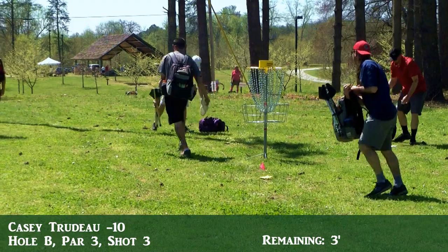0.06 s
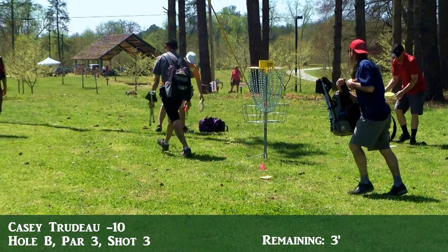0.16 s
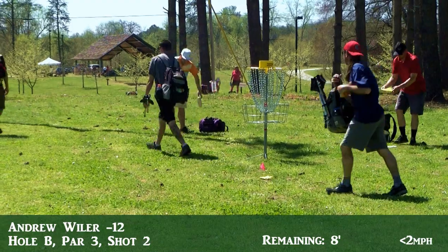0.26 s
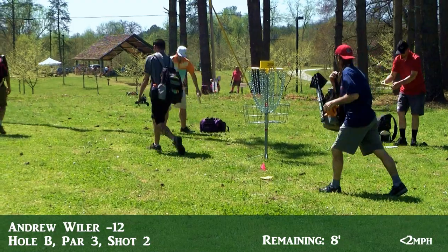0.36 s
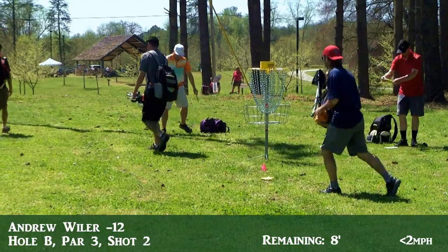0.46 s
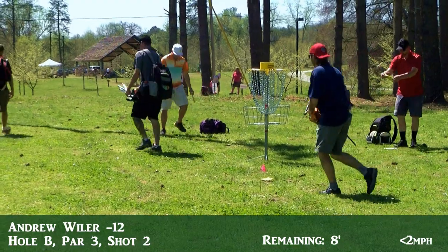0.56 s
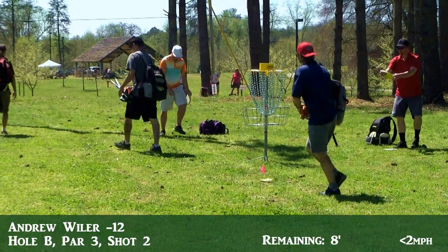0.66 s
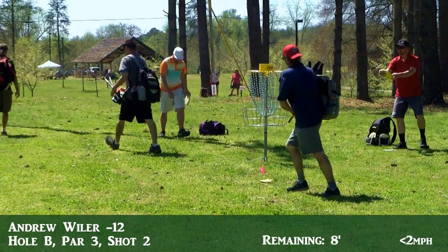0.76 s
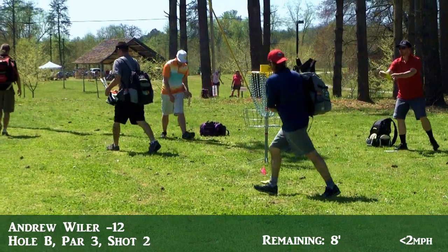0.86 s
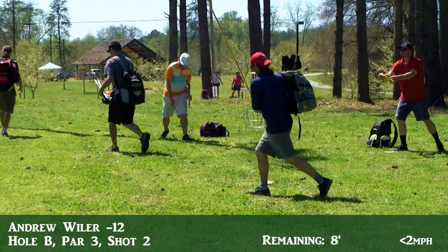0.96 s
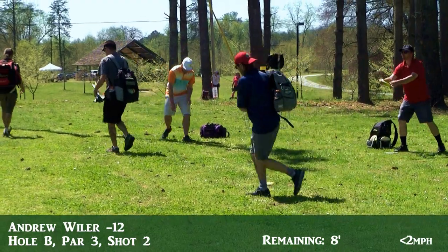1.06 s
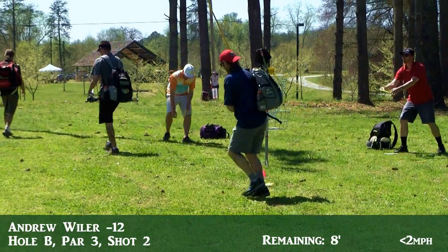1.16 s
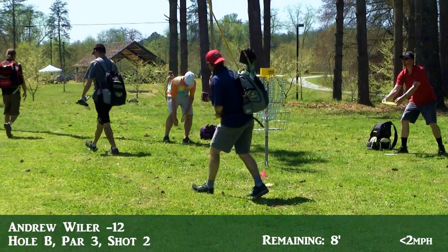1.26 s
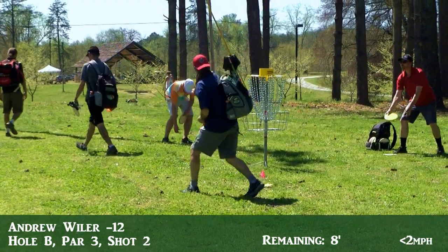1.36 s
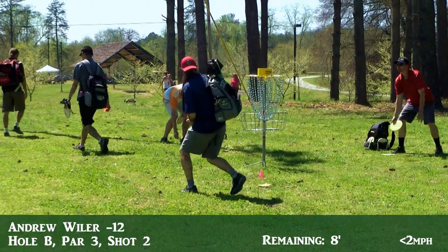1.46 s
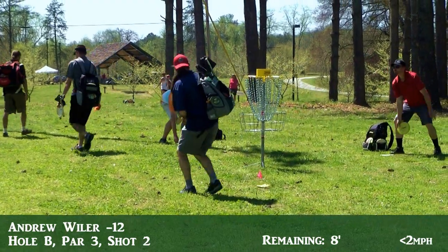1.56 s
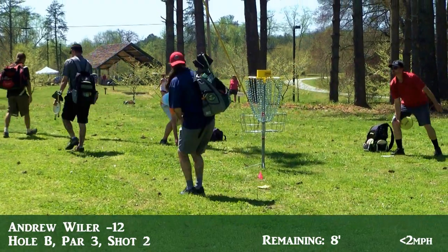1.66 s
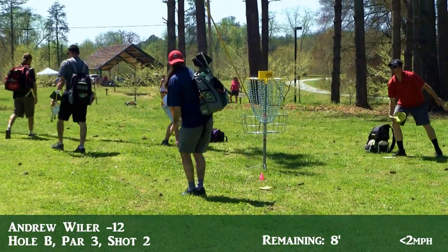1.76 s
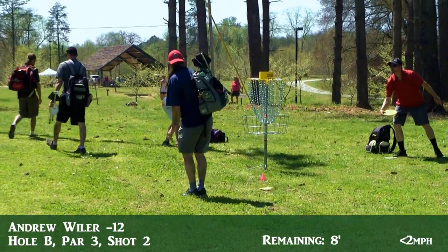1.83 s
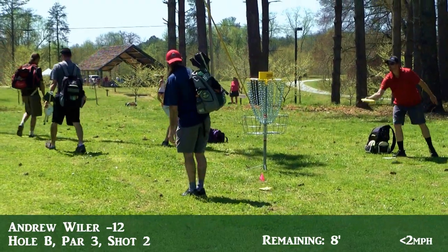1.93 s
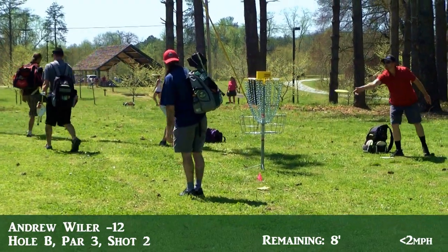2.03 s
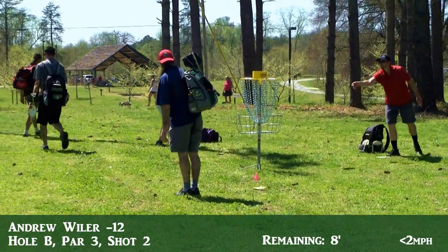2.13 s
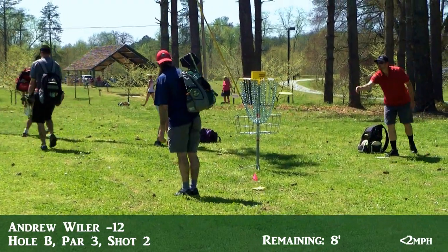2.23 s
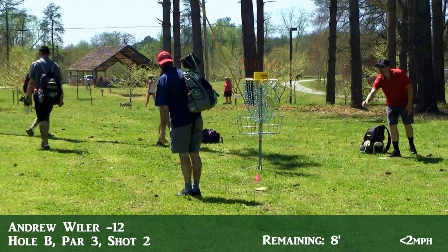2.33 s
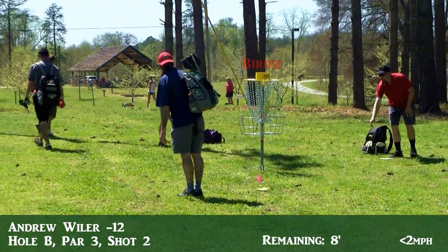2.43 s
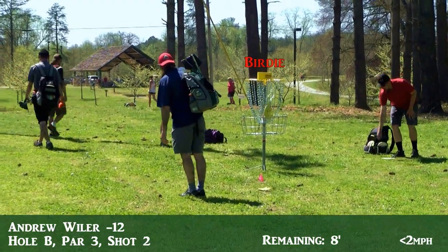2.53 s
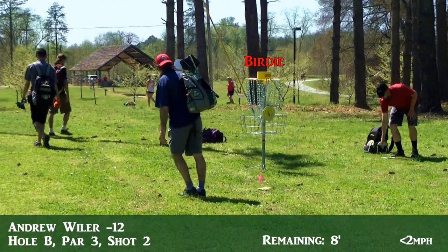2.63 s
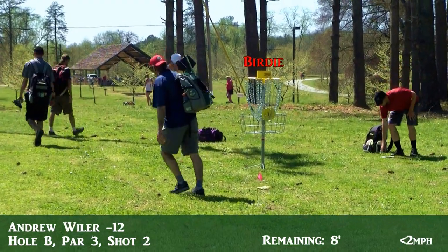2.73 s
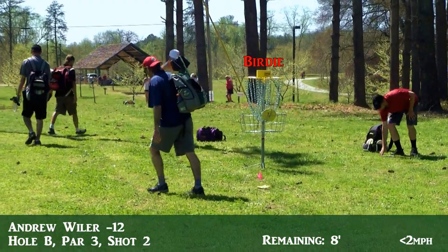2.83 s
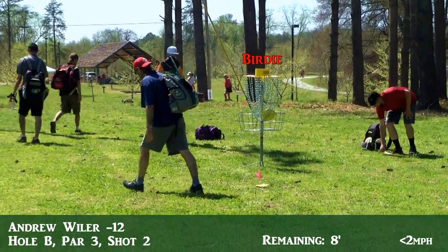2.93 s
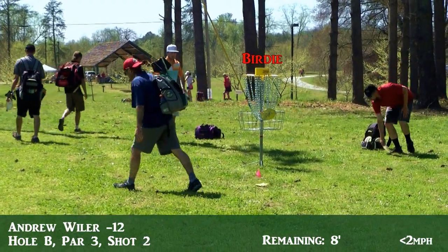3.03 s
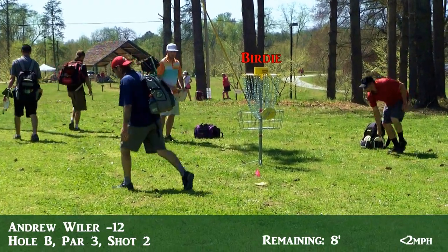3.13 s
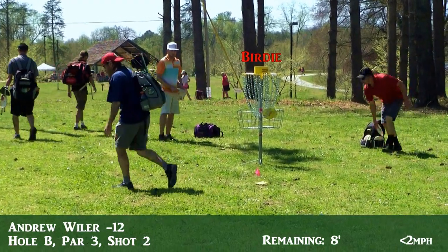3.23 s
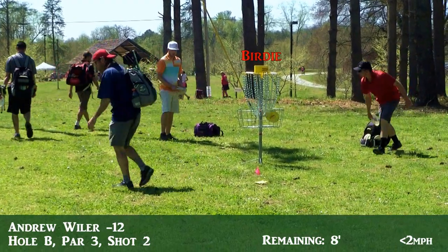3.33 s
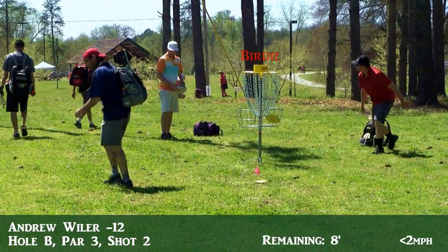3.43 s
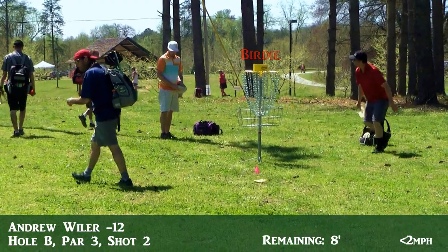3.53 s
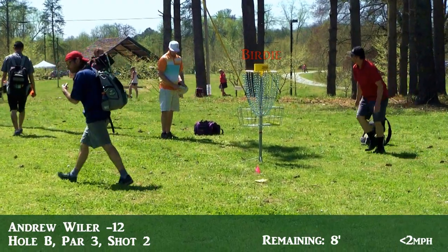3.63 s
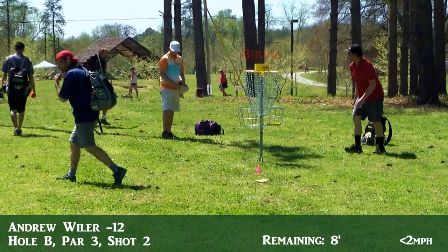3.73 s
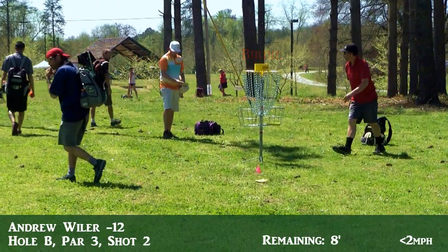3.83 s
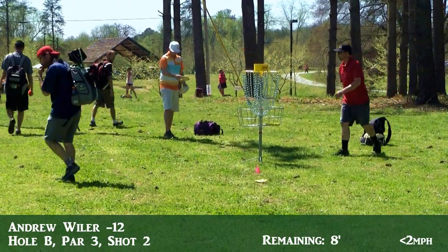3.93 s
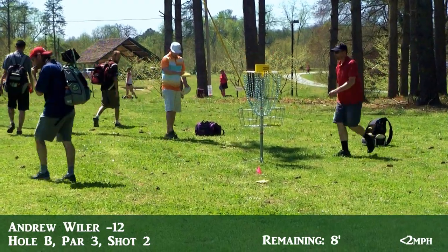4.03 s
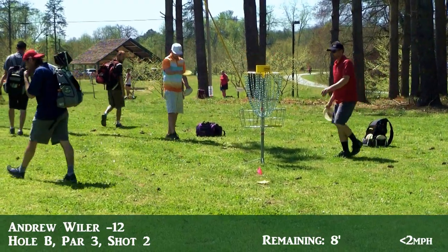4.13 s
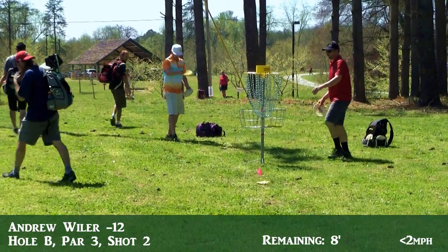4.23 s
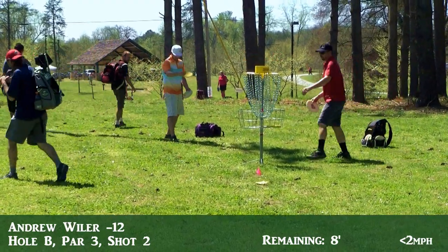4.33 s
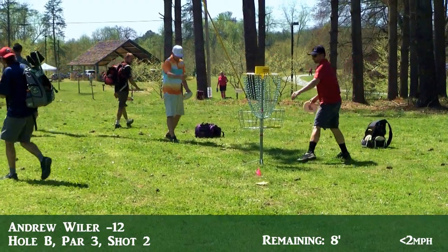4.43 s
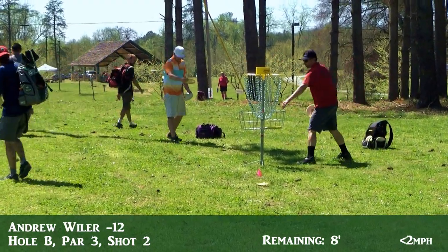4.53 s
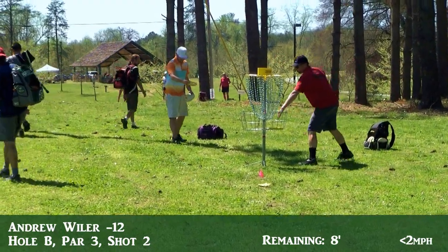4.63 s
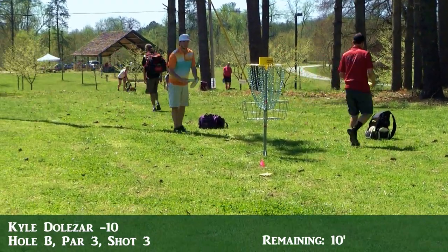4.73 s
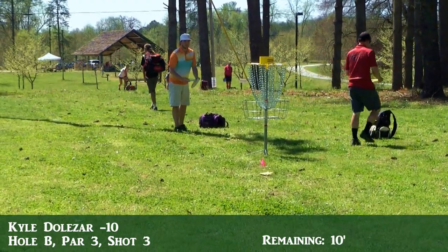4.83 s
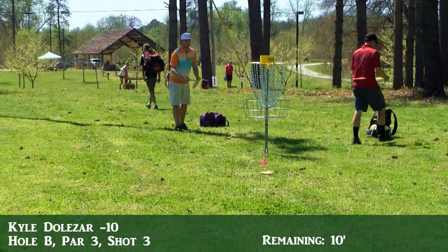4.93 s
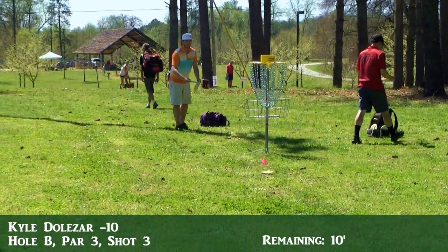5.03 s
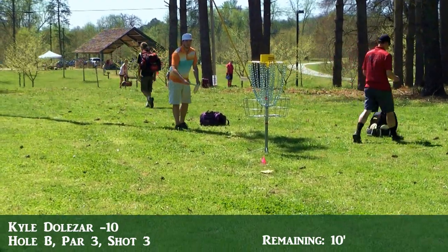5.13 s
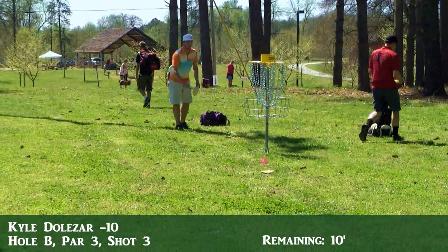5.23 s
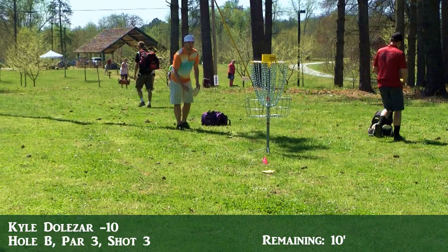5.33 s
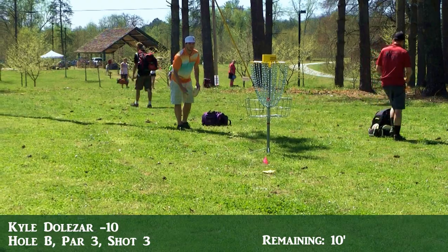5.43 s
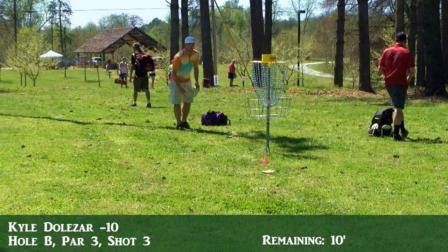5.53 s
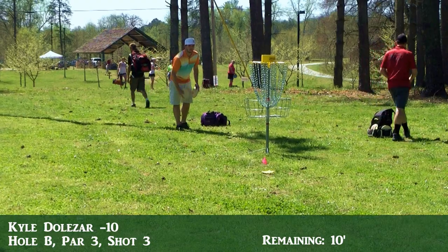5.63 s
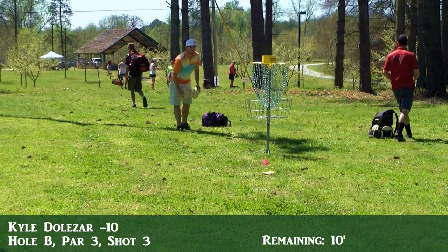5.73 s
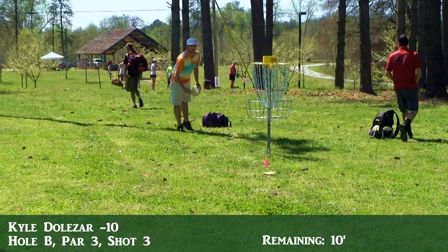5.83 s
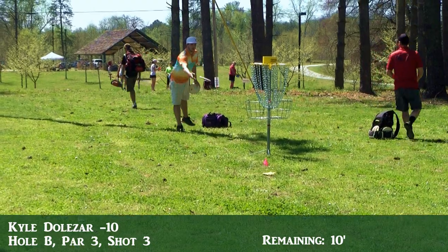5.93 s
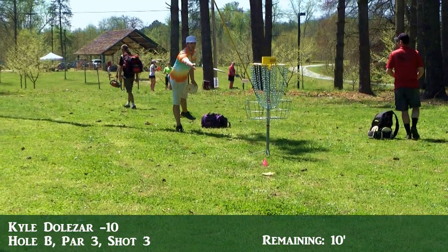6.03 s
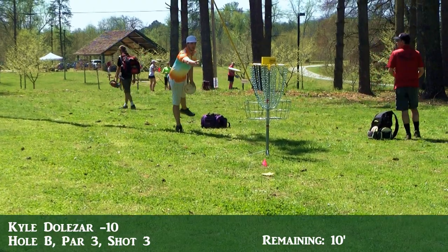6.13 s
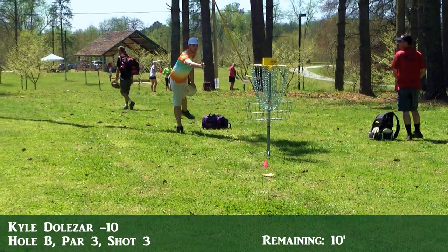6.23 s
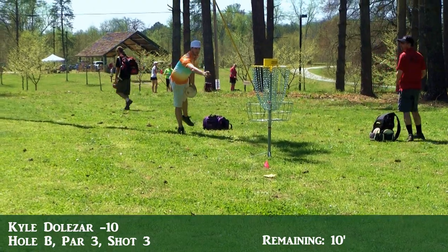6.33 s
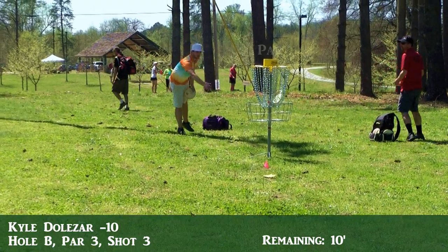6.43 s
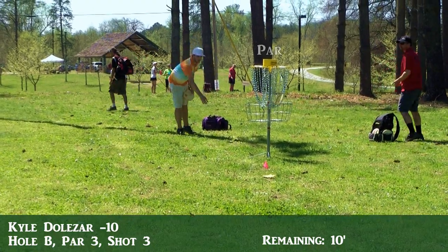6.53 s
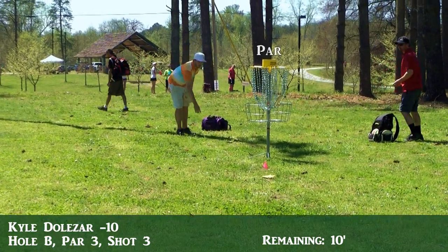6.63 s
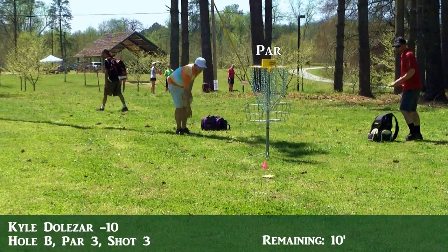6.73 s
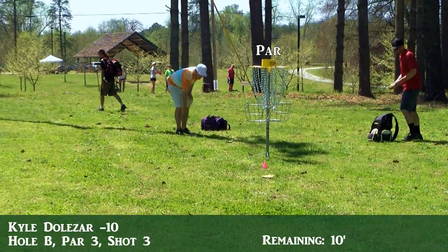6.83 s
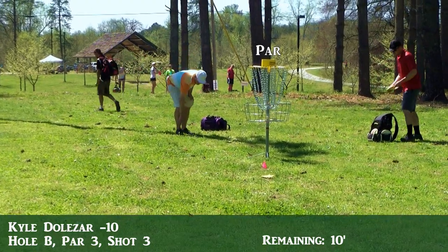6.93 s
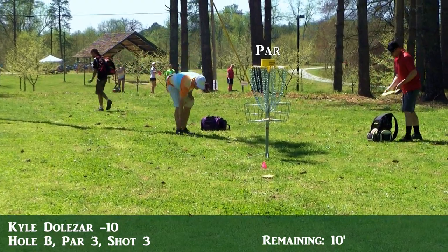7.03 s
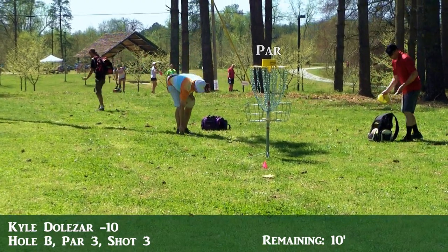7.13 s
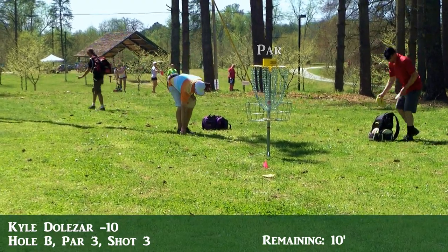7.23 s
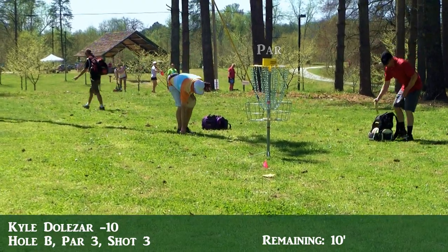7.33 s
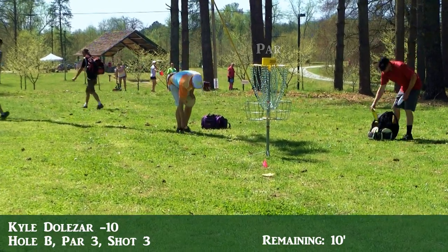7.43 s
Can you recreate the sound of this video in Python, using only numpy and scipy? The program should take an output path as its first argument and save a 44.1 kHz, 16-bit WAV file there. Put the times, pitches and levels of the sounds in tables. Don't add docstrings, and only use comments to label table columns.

```python
import sys
import numpy as np
from scipy import signal
from scipy.fft import rfft, irfft, next_fast_len
from scipy.io import wavfile
from scipy.ndimage import uniform_filter1d, map_coordinates

SR = 44100
rng = np.random.default_rng(int(sys.argv[2]) if len(sys.argv) > 2 else 0)


def master_out(mix):
    frames = np.transpose(np.atleast_2d(mix))
    ceiling = np.clip(frames, -1, 1)
    pcm = np.round(ceiling * 32767).astype(np.int16)
    wavfile.write(sys.argv[1], SR, pcm)


def field_ratio(decibels):
    return 10 ** (np.asarray(decibels, dtype=float) / 20)


N = 329802


def unit(x):
    return x / np.sqrt(np.mean(x ** 2) + 1e-20)


def along(points, hz):
    f, v = np.transpose(points)
    return np.interp(np.log(hz + 1), np.log(f + 1), v)


def curves(rows):
    s, *cols = np.transpose(rows)
    return np.array([np.interp(np.arange(N) / SR, s, c) for c in cols])


def wobble(knots_per_s):
    s = np.arange(0, N / SR + .002, .001)
    knots = rng.standard_normal(int(N * knots_per_s / SR) + 4)
    return np.interp(np.arange(N) / SR, s, map_coordinates(knots, [s * knots_per_s]))


def filtered(x, response):
    m = next_fast_len(N + 8192)
    return irfft(rfft(x, m) * response(np.fft.rfftfreq(m, 1 / SR)), m)[..., :N]


def resonate(x, hz, t60_s):
    r, w = field_ratio(-60 / (t60_s * SR)), 2 * np.pi * hz / SR
    return signal.lfilter([2 * np.sin(w) * np.sqrt(1 - r)], [1, -2 * r * np.cos(w), r * r], x)


def add(track, s, sound):
    track[round(s * SR):][:len(sound)] += sound


def contacts(per_s, scatter_db):
    count, out = round(per_s * N / SR), np.zeros(N)
    blows = rng.choice([-1, 1], count) * field_ratio(scatter_db * rng.standard_normal(count))
    out[rng.integers(N, size=count)] = blows
    return unit(out)


# (frequency [Hz], correlation [-1..1])
LIKENESS = [(30, .96), (250, 0.99), (1000, .997), (4000, 0.99), (12000, .998)]


def rush(spectrum, patchy_db):
    z = signal.stft(rng.standard_normal((2, N)), nperseg=512)[2]
    field = uniform_filter1d(rng.standard_normal(z.shape[1:]), 6, 0)
    field = uniform_filter1d(field, 14, 1)
    pair = signal.istft(z * field_ratio(patchy_db * unit(field)), nperseg=512)[1][:, :N]
    turn = lambda hz: np.arccos(np.clip(along(LIKENESS, hz), -1, 1)) / 2
    split = lambda hz: field_ratio(along(spectrum, hz)) * [np.cos(turn(hz)), np.sin(turn(hz))]
    mid, side = filtered(pair, split)
    return unit(np.array([mid + side, mid - side]))


# (time [s], level [dB])
TRAFFIC = [(0.0, -1.2), (2.5, 1.5), (3.3, -4), (4.5, 1.5), (5.6, 1.8), (6.4, -1.5), (7.48, -0.8)]
# (time [s], hum [Hz], load [0-1])
ENGINE = [(0.0, 72, .05), (1.3, 71.5, .2), (3.0, 70.8, .1), (3.45, 69, .55), (4.58, 68.2, .7),
          (4.98, 62.9, .95), (6.66, 63, .8), (7.48, 60, .5)]
# (order [half orders], idle level [dB], gain at full load [dB])
ENGINE_ORDERS = [(2, -69, 3), (3, -70, 12), (4, -61, -11), (5, -76, 10.5), (6, -75, 11)]
# (frequency [Hz], density [dB per Hz])
RUMBLE = [(15, -72), (25, -29), (44, -12), (87, -5), (104, -2.5), (124, 2), (178, 0), (263, -3.5),
          (400, -23), (520, -51), (880, -120)]
# (frequency [Hz], density [dB per Hz])
ROAR = [(120, -20), (200, -11), (254, -13.5), (439, -8), (482, -9), (568, -4.5), (950, -.5), (1400, -3),
        (1830, -6.5), (2800, -15.5), (3880, -26), (5600, -31), (10400, -32), (12300, -31), (15900, -36)]


def road():
    heavy_db, = curves(TRAFFIC)
    hum_hz, load = curves(ENGINE)

    def tone(hz, db):
        level = field_ratio(db + 2.2 * wobble(8))
        return level * np.sin(2 * np.pi * np.cumsum(hz * (1 + .012 * wobble(6.5))) / SR)

    engine = sum(tone(hum_hz * k / 2, db + gain_db * load) for k, db, gain_db in ENGINE_ORDERS)
    rumble = field_ratio(-61 + heavy_db + 0.87 * wobble(2.3)) * rush(RUMBLE, patchy_db=2.5)
    roar_db = -48.4 - .1 * heavy_db + 0.31 * wobble(3.01)
    return engine + rumble + field_ratio(roar_db) * rush(ROAR, patchy_db=0.71)


# (frequency [Hz], t60 [s])
TREES = [(500, 0.45), (4000, 0.28), (14000, .25)]


def trees(x):
    hz, t, z = signal.stft(rng.standard_normal((2, SR // 2)), SR, nperseg=256)
    tail = signal.istft(z * field_ratio(-60 * t / along(TREES, hz)[:, None]), SR, nperseg=256)[1]
    tail = tail[0] + 0.053 * np.array([tail[1], -tail[1]])
    tail = tail / np.linalg.norm(tail[0])
    return signal.fftconvolve(np.pad(x, (300, 0))[None], tail, axes=1)[:, :N]


# (frequency [Hz], level [dB])
INSECT = (10650, -89)


def insect():
    hz, db = INSECT
    song = field_ratio(db + 4 * wobble(12)) * resonate(rng.standard_normal(N), hz, .03)
    return song * field_ratio([[3], [-5]])


# (time [s], level [dB], start [Hz], end [Hz], length [s])
CHIRPS = [
    (3.635, -46, 800, 930, .12),
    (4.909, -49, 2636, 3100, .012),
    (4.922, -48, 3280, 2700, 0.019),
    (4.953, -50, 2780, 3500, 0.0093),
]


def bird():
    out = np.zeros(N + SR)
    for s, db, start_hz, end_hz, length_s in CHIRPS:
        size = round(length_s * SR)
        phase = 2 * np.pi * np.cumsum(np.linspace(start_hz, end_hz, size)) / SR
        add(out, s, field_ratio(db) * np.hanning(size) * np.sin(phase))
    return out[:N]


# (time [s], peak [dB], centre [Hz], length [s])
RUSTLES = [(.2, -50, 7000, .015), (.574, -49, 6000, .004), (0.495, -31, 4030, 0.0025),
           (.4945, -35, 8900, 0.0023), (.865, -49, 10000, .03), (0.905, -37.5, 4500, .015),
           (.908, -44, 9000, .01), (1.11, -50, 9000, .005), (1.209, -42, 12200, .012),
           (1.225, -48, 7000, .006), (1.238, -46, 8160, .012), (1.25, -50, 9000, .12),
           (1.311, -45, 8000, .004), (1.267, -48, 4900, 0.027), (1.288, -47.5, 9900, .03),
           (1.393, -42.5, 8800, .025), (1.423, -45, 9000, .007), (1.44, -51, 9000, .1),
           (1.512, -45, 8550, 0.014), (1.535, -48, 5000, 0.04), (1.585, -48, 7500, 0.007),
           (1.6, -52, 10000, .08), (1.649, -48, 11000, .006), (1.676, -49, 9500, 0.11),
           (1.7055, -43, 9000, 0.03), (1.732, -44, 8000, .006), (1.787, -46.5, 9900, .03),
           (1.797, -46.5, 11500, 0.0327), (2.074, -48.5, 8600, .01), (2.1, -48, 10000, .03),
           (3.443, -42, 8000, .01), (3.476, -42, 7000, .006), (4.09, -48.5, 9000, 0.027),
           (4.21, -42, 8000, .008), (4.44, -48, 9000, .01), (4.49, -49, 6000, .08), (4.93, -53, 8000, .04),
           (5.005, -49, 9000, .004), (5.035, -52.5, 8020, .03), (5.244, -48, 8600, 0.054),
           (5.285, -49, 9000, .01), (6.045, -50, 6016, 0.011)]


def walkers():
    out, t = np.zeros(N + SR), np.arange(SR // 5) / SR
    for s, db, hz, length_s in RUSTLES:
        luck = rng.standard_normal((2, SR // 5))
        swell = (t / length_s) ** 0.5 * field_ratio(-20 * (t / length_s) ** 2)
        snaps = field_ratio(7.5 * np.repeat(luck[1, ::70], 70)[:len(t)])
        crackle = resonate(luck[0] * snaps * swell, hz, 0.00045)
        crackle = resonate(crackle, hz, 0.00045)
        add(out, s, field_ratio(db) * crackle / np.abs(crackle).max())
    return out[:N]


# (frequency [Hz], level [dB], t60 [s])
TRAY_MODES = [(1744, -8, .3), (1970, -7, .2), (2397, -2, .2), (2466, -3, .2), (2875, -5, .15),
              (3311, -6, .1), (3801, -3, .15), (5351, -6, .2), (5809, -4, .1)]
# (time [s], level [dB])
TRAY_HITS = [(2.4418, -33), (2.452, -39), (2.47, -39), (2.497, -41), (2.6468, -38), (2.73, -39),
             (2.8469, -46), (3.719, -49), (3.745, -50), (6.492, -36), (6.512, -38), (6.57, -40),
             (6.59, -40), (6.645, -42), (6.972, -42), (7.02, -46)]


def tray():
    out, t = np.zeros(N + SR), np.arange(SR // 5) / SR
    hz, level_db, t60_s = np.transpose(TRAY_MODES)[:, :, None]
    damped_s = np.clip(.45 * t60_s, .03, .2)
    waves = field_ratio(level_db - 60 * t / damped_s) * np.sin(2 * np.pi * hz * t)
    for s, db in TRAY_HITS:
        add(out, s, field_ratio(db + 3 * rng.standard_normal(len(TRAY_MODES))) @ waves)
    return out[:N]


# (time [s], peak [dB], pitch [Hz], t60 [s])
KNOCKS = [(0.496, -30, 2714, 0.035), (2.442, -22, 2500, 0.03), (2.4425, -20, 3300, .035),
          (2.469, -37, 1990, 0.04), (2.526, -33, 1560, 0.04), (2.534, -30, 1050, .05),
          (2.83, -33, 1090, .03), (2.732, -27.5, 1530, 0.04), (2.848, -28, 1780, 0.033),
          (2.884, -31, 1540, 0.04), (2.919, -38, 1530, 0.04), (2.984, -44, 1070, 0.04),
          (3.4797, -27, 1900, .015), (3.5476, -27, 1700, 0.018), (3.5665, -26, 1600, 0.018),
          (3.719, -31, 2430, 0.12), (3.742, -33, 2300, .06), (6.484, -6.5, 3050, 0.025),
          (6.514, -30, 2290, 0.04), (6.532, -16, 1100, 0.025), (6.539, -15, 1350, .03),
          (6.609, -25, 1200, 0.025), (6.727, -30, 950, .03), (6.962, -28, 1950, 0.05),
          (7.021, -23, 2140, 0.02), (7.051, -29, 2000, .015), (7.087, -22, 1760, 0.025),
          (7.119, -28, 2300, 0.015), (7.255, -34, 1030, .03)]


def disc():
    out, t = np.zeros(N + SR), np.arange(SR // 8) / SR
    for s, db, hz, t60_s in KNOCKS:
        push = (rng.standard_normal(len(t)) + 9 * (t == 0)) * field_ratio(-60 * t / t60_s)
        body = resonate(push, hz, 0.0054)
        body += 0.36 * resonate(push, 1.6 * hz, 0.0055)
        body += .5 * resonate(push, 0.617 * hz, 0.0072)
        tick = resonate(push * field_ratio(-60 * t / .006), 4500, .0004)
        knock = body / np.abs(body).max() + .25 * tick / np.abs(tick).max()
        add(out, s, field_ratio(db - 1.5) * knock)
    return out[:N]


def free_ring(modes, t):
    flutter_db, flutter_per_s = 2.5, 45
    hz, db, t60_s = np.transpose(modes)[:, :, None]
    knots = rng.standard_normal((len(modes), 60))
    flutter = np.array([map_coordinates(row, [t * flutter_per_s], mode="mirror") for row in knots])
    level = field_ratio(db + flutter_db * flutter - 60 * t / t60_s)
    return level * np.sin(2 * np.pi * hz * t) * (1 - np.exp(-t / .001)), t60_s


def ring(family, t, free_s, luck, unequal, survive):
    choke_s = .025
    waves, t60_s = family
    strength, choke = unequal * luck[:, :len(waves), None]
    gain, until = field_ratio(5.6 * strength[:, 0]), free_s * np.exp(choke)
    early = t[t < until.max() + choke_s]
    out = (gain * survive * t60_s[:, 0]) @ waves
    fade = np.clip(1 - (early - until) / choke_s, 0, 1) ** 2
    out[:len(early)] += gain @ (fade * waves[:, :len(early)])
    return out


# (frequency [Hz], level [dB], t60 [s])
FIRST_BEND = [(1532, -2.5, 1.2), (1743, -13, .4), (1962, -8, .2), (2520, -17, .12)]
SECOND_BEND = [(3758, -22, .2), (4216, 0, .17), (4299, -8, .6), (4313, -2.5, 1.05), (4353, -6, .6),
               (4432, -12, .18), (4560, -9, .28), (4749, -10, .4), (5028, -13, .35), (5315, -14, .15),
               (5475, -16, .11), (5675, -17, .1), (5978, -17, .15)]
THIRD_BEND = [(7068, -18, .1), (7990, -18, .2), (8203, -4, .35), (8231, -6, .25), (8264, -4, .25),
              (8287, -9, .2), (8325, -8, .18), (8419, -13, .2), (8552, -14, .2), (8897, -17, .22),
              (9140, -17, .12), (9400, -20, .08), (9728, -18, .12)]
# (time [s], level [dB], first bend re level [dB], third bend re level [dB], free ring [s])
STRIKES = [(1.951, -80, 2, 21, .013), (2.04, -80, 0.5, 24, .012), (2.118, -80, 0.5, 24, .03),
           (2.4313, -63, -14.5, 6, .012), (2.515, -47, 6, 9, .037), (2.5694, -19.5, -5, 2, .06),
           (2.6458, -26, -4, 1, .09), (2.7187, -34, -21, -17, .06), (2.789, -36, -8, -19, .06),
           (2.8555, -36, -10, -2, .04), (2.897, -32, -9, -12, .05), (2.95, -39, -11, -14, .12),
           (3.0, -43, -12, -14, .1), (3.095, -49, -20, -10, .2), (3.548, -53, -10.5, -13, .024),
           (3.587, -41, -20, -12, .07), (3.598, -52, -11, 6, .01), (3.6065, -38, -26, 8, .02),
           (3.685, -50, -20, -8, .1), (3.76, -54, -20, -12, .4), (3.84, -55, -20, -12, .15),
           (3.98, -58, -20, -24, .1), (4.371, -68, 0.5, 13, .05), (4.613, -74, 7.5, 9, .019),
           (4.662, -36, -30, -1, .05), (4.6625, -52, 14, 8, .135), (4.77, -55, -15, -6, .04),
           (5.385, -58.5, -6, -3.5, .04)]
LATE_STRIKES = [(6.503, -41, -18, 7, .02), (6.522, -30, -16.5, 3.5, .023), (6.535, -31, -14, 6, .02),
                (6.5495, -32, -14, 13, .012), (6.558, -29, 1.5, 5, .033), (6.593, -34, -20, 0, .03),
                (6.603, -31, -20, -2, .04), (6.63, -29, -20, -6, .075), (6.62, -27, -23, 5.5, .07),
                (6.705, -38, -20, -4, .05), (6.757, -38, 1, -2.5, .03), (6.794, -38, 3.5, -4, .025),
                (6.82, -33, -19, 2, .058), (6.87, -38, -9, -4, .06), (6.915, -44, -20, -4, .05),
                (6.96, -39, -6, 0, .04), (6.972, -32, -9, 3, .04), (7.0, -39, -19, 1, .06),
                (7.06, -42, -9, -4, .2), (7.16, -45, -8, -6, .15), (7.27, -51, -8, -8, .15)]


def rods():
    out, t = np.zeros(N + SR), np.arange(SR * 3 // 5) / SR
    low, middle, high = (free_ring(modes, t) for modes in (FIRST_BEND, SECOND_BEND, THIRD_BEND))
    snap = field_ratio(-12.5 - 60 * t / 0.057)
    for s, db, first_db, third_db, free_s in STRIKES + LATE_STRIKES:
        luck = rng.standard_normal((3, 2, 13))
        crack = snap * resonate(rng.standard_normal(len(t)), 6000, 0.000279)
        crack = field_ratio(max(first_db, 0, third_db)) * crack
        first = field_ratio(first_db) * ring(low, t, free_s, luck[0], unequal=0, survive=0.11)
        second = field_ratio(-5.5) * ring(middle, t, free_s, luck[1], unequal=.25, survive=0.3)
        third = field_ratio(third_db - 1.5) * ring(high, t, free_s, luck[2], unequal=0.4, survive=.45)
        add(out, s, field_ratio(db) * (crack + first + second + third))
    return out[:N]


# (frequency [Hz], level [dB], t60 [s], spread between links [Hz])
LINK = [(11900, 0, .24, 24), (12020, -7, .16, 40), (12140, -13, .1, 45), (12270, -7, .15, 45),
        (12460, -13, .1, 70), (12670, -6.5, .17, 75), (11680, -14, .1, 70), (13270, -21, .12, 70),
        (13500, -22, .14, 60), (13800, -26, .12, 60), (7990, -22, .2, 30), (8750, -27, .15, 60),
        (5330, -18, .09, 90)]
# (time of peak [s], level [dB])
CLAPS = [(2.447, -25), (2.4735, -22), (2.483, -15), (2.503, -25), (2.533, -20), (2.548, -23), (3.609, -38),
         (3.659, -38), (4.387, -35), (6.506, -21), (6.512, -17), (6.534, -21), (6.542, -17), (6.561, -23),
         (6.658, -23)]


def claps():
    half_width_s, upper_db = .004, -7
    out, t = np.zeros(N + SR), np.arange(-SR // 50, SR // 50) / SR
    (low_hz, *_, low_spread), (high_hz, *_, high_spread) = LINK[0], LINK[3]
    swell = np.exp(-.5 * (t / half_width_s) ** 2)
    for (s, db), luck in zip(CLAPS, rng.standard_normal((len(CLAPS), 2))):
        tone = np.sin(2 * np.pi * (low_hz + low_spread * luck[0]) * t)
        tone += field_ratio(upper_db) * np.sin(2 * np.pi * (high_hz + high_spread * luck[1]) * t)
        add(out, s + t[0], field_ratio(db) * swell * tone)
    return out[:N]


def bursts(s, db, fade_s, rise):
    late = np.arange(0, N, 32) / SR - np.reshape(s, (-1, 1))
    fall = np.maximum(late, -late / rise) / np.reshape(fade_s, (-1, 1))
    power = field_ratio(2 * np.reshape(db, (-1, 1)) - 2 * 20 * fall).sum(0)
    return np.repeat(power, 32)[:N]


# (time [s], clatter [dB], link jingle [dB], fade [s per 20 dB])
THROWS = [
    (2.442, -33, -20, .12),
    (6.483, -34, -17, .15),
]
# (time [s], clatter [dB], link jingle [dB], fade [s per 20 dB])
JOLTS = [(2.571, -36, -27, .05), (2.648, -41, -41, .07), (2.732, -45, -40, .05), (3.72, -51, -36, .14),
         (4.662, -50, -50, .045), (6.505, -37, -22, .06), (6.53, -35, -22, .1), (6.556, -37, -26, .1),
         (6.592, -39, -27, .1), (6.622, -41, -30, .1), (6.655, -43, -27, .12), (6.697, -46, -33, .08),
         (6.822, -42, -32, .055), (6.952, -49, -30, .06)]
# (time of peak [s], clatter [dB], link jingle [dB], fade [s per 20 dB])
SWINGS = [(.312, -67, -56, .066), (.496, -65, -68, .028), (2.485, -38, -15, .045), (2.532, -42, -23, .04),
          (2.885, -42, -33, .13), (3.1, -58, -40, .15), (3.3, -62, -40, .45), (3.47, -60, -46, .08),
          (3.57, -55, -50, .1), (3.605, -52, -35, .07), (3.85, -66, -45, .35), (4.17, -61, -46, .14),
          (4.385, -56, -32, .075), (5.286, -70, -71, .05), (5.33, -78, -53, .04), (5.392, -69, -56, .05),
          (5.448, -88, -58, .15), (5.836, -89, -69, .05), (6.052, -72, -70, .045), (6.755, -48, -27, .045),
          (6.975, -40, -30, .06), (7.02, -50, -34, .04), (7.09, -52, -28, .1), (7.25, -57, -34, .4)]


def motion():
    throw_rise, swing_rise = .006, .55
    longer = 9
    settling = np.array(THROWS) * [1, 1, 1, longer] + [0, -14.5, -12, 0]
    kinds = [(THROWS + JOLTS, throw_rise), (settling, throw_rise / longer), (SWINGS, swing_rise)]
    tables = [(*np.transpose(rows), rise) for rows, rise in kinds]
    clatter = sum(bursts(s, db, fade_s, rise) for s, db, _, fade_s, rise in tables)
    jingle = sum(bursts(s, db, fade_s, rise) for s, _, db, fade_s, rise in tables)
    s, db = np.transpose(STRIKES + LATE_STRIKES)[:2]
    buzz = bursts(s, db + 5, .035, throw_rise)
    return np.sqrt([clatter, jingle, field_ratio(2 * -2) * clatter + buzz])


# (time [s], peak [dB])
CLINKS = [(.285, -49), (.308, -47), (.352, -51), (.452, -52), (2.4473, -18), (2.4792, -15), (2.5317, -17),
          (2.6065, -17), (2.6964, -29), (2.7761, -28), (2.8483, -26), (2.9184, -31), (2.9414, -28),
          (2.9861, -29), (3.0938, -28), (3.224, -36), (3.2523, -29), (3.2969, -36), (3.3388, -32),
          (3.4381, -36), (3.475, -36), (3.5847, -36), (3.6067, -35), (3.6576, -30), (3.7159, -34),
          (3.8805, -37), (4.0901, -45), (4.1499, -42), (4.1963, -33), (4.3709, -34), (4.6147, -35),
          (4.659, -37), (4.676, -36), (4.698, -38), (4.728, -40), (4.745, -38), (4.77, -42), (4.873, -52),
          (5.325, -49), (5.39, -43), (5.445, -47), (5.52, -49), (5.825, -57), (5.905, -57), (5.987, -54),
          (6.045, -51), (6.455, -51)]
LATE_CLINKS = [(6.4895, -14), (6.5048, -12), (6.5097, -12), (6.5407, -10), (6.551, -12), (6.575, -17),
               (6.6, -19), (6.624, -20), (6.6577, -17.5), (6.697, -25), (6.7186, -23), (6.738, -22),
               (6.803, -23), (6.843, -28), (6.9004, -27), (6.9582, -26), (6.9936, -24), (7.068, -22),
               (7.1548, -25), (7.1987, -30), (7.2865, -31), (7.3473, -33), (7.4137, -39)]
# (frequency [Hz], density [dB per Hz])
CLATTER = [(530, -49), (900, -17), (2010, -10.5), (2990, -13), (5390, -12), (6300, -19), (6860, -17),
           (9500, -12), (10800, -14), (11900, -12), (15900, -26)]
# (frequency [Hz], gain [dB])
SOFT_TOUCH = [(9000, 0), (9600, -14), (11100, -14), (11550, 0), (13900, 0), (14400, -16)]


def chains(count=8):
    clatter, jingle, shake = motion()
    clumps = field_ratio(2.1 * wobble(70))
    s, peak_db = np.transpose(CLINKS + LATE_CLINKS)
    at = np.round(s * SR).astype(int)
    knocks = clatter * contacts(3000, scatter_db=4.0) * clumps
    knocks[at] += field_ratio(peak_db - 25)
    colour = lambda hz: field_ratio(along(CLATTER, hz))
    colour_rms = np.sqrt(np.mean(colour(np.linspace(0, SR / 2, 999)) ** 2))
    out = field_ratio(6.5) * filtered(knocks, colour) / colour_rms

    detune, share = rng.standard_normal((2, count, len(LINK)))
    mode_db = np.array([db for _, db, *_ in LINK])
    links = np.zeros(N)
    for k in range(count):
        blows = contacts(75, scatter_db=4.5) * clumps * jingle * field_ratio(-19)
        blows[at[k::count]] += field_ratio(peak_db[k::count] + 12.5)
        modes = [resonate(blows, hz + spread_hz * d, t60_s)
                 for (hz, _, t60_s, spread_hz), d in zip(LINK, detune[k])]
        links += field_ratio(mode_db + 3.5 * share[k]) @ modes
    out += filtered(links, lambda hz: field_ratio(along(SOFT_TOUCH, hz)))

    for family, family_db in ((SECOND_BEND, -8), (THIRD_BEND, -11)):
        for hz, db, t60_s in family:
            shaking = contacts(300, scatter_db=7) * shake
            out += field_ratio(family_db + db) * resonate(shaking, hz, 0.6 * t60_s)
    return out


def scene():
    near = chains() + claps() + rods() + disc() + tray() + walkers() + bird()
    near = filtered(near, lambda hz: 1 / (1 + (650 / (hz + 1)) ** 4))
    apart = field_ratio(-34.5) * filtered(np.roll(near, 40), lambda hz: .3 + (hz / 11000) ** 2)
    return near + [apart, -apart] + field_ratio(-16) * trees(near) + road() + insect()


# (frequency [Hz], density [dB per Hz])
HISS = [(24, -35), (40, -5.5), (515, -4), (938, -4), (1270, -11), (2040, -13), (2690, -16), (4010, -13),
        (15900, -11)]


def top_cut(x):
    return signal.sosfilt(signal.butter(12, 16640, fs=SR, output="sos"), x)


def record(dry):
    hiss = unit(filtered(rng.standard_normal(N), lambda hz: field_ratio(along(HISS, hz))))
    hiss = field_ratio(-73.5 - 1.5) * hiss

    def band(hz):
        bass_cut = .06 + 1 / (1 + (54 / (hz + 1)) ** 8)
        return bass_cut * np.clip((15950 - hz) / 350, 0, 1)

    mix = filtered(dry + [hiss, -hiss], band)
    return top_cut(mix)


dry = scene()
out = record(dry)
master_out(out)
```